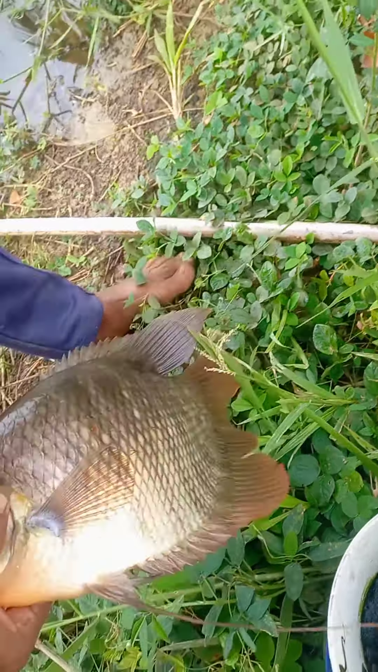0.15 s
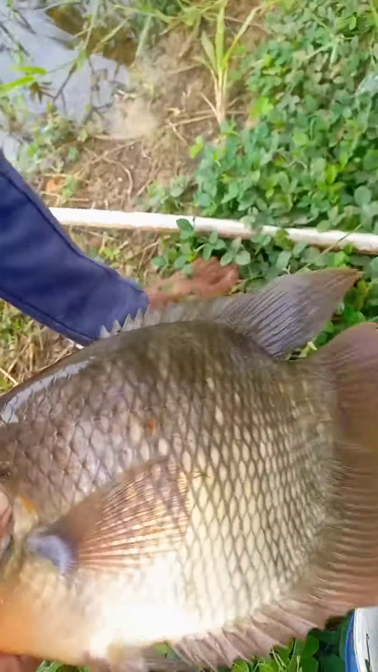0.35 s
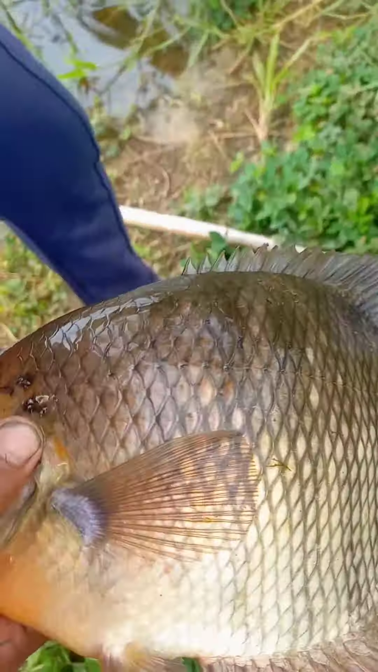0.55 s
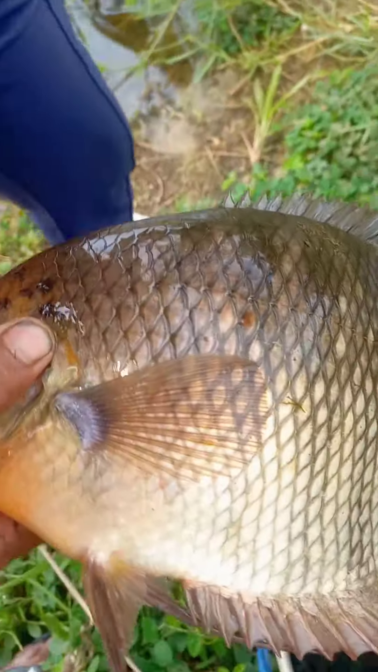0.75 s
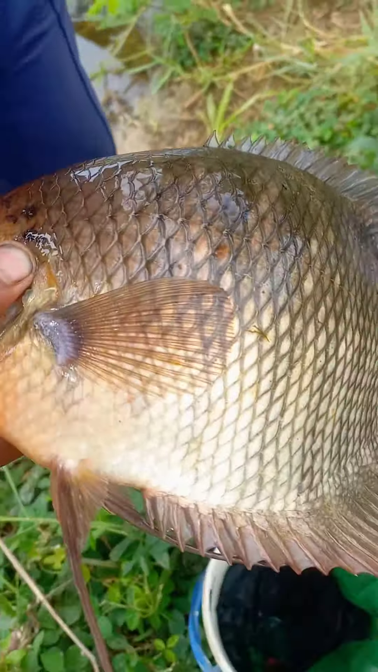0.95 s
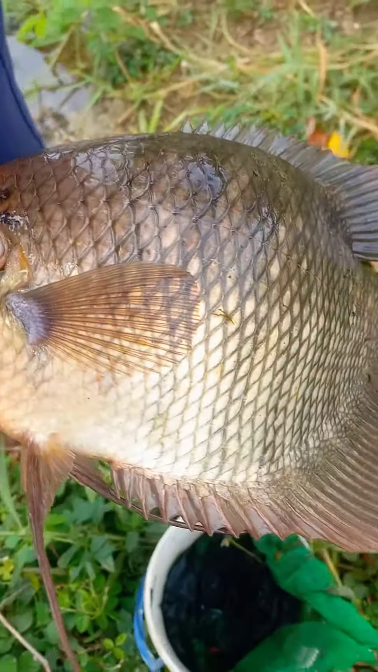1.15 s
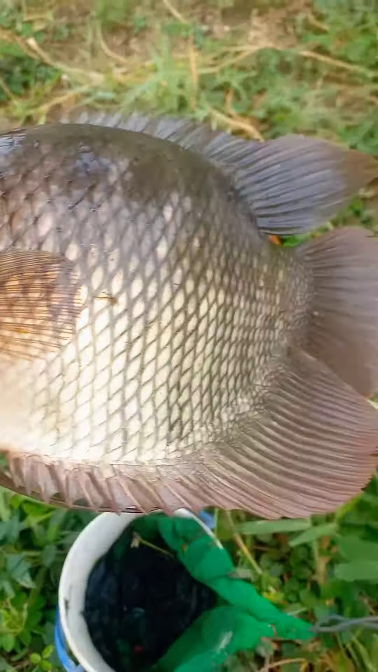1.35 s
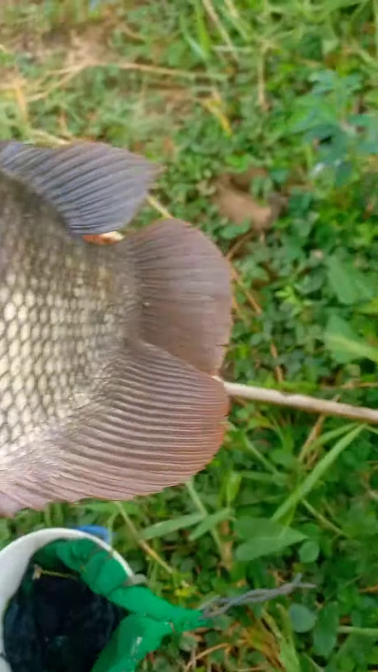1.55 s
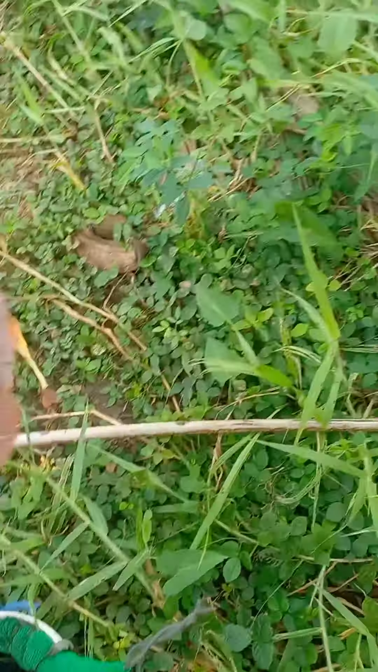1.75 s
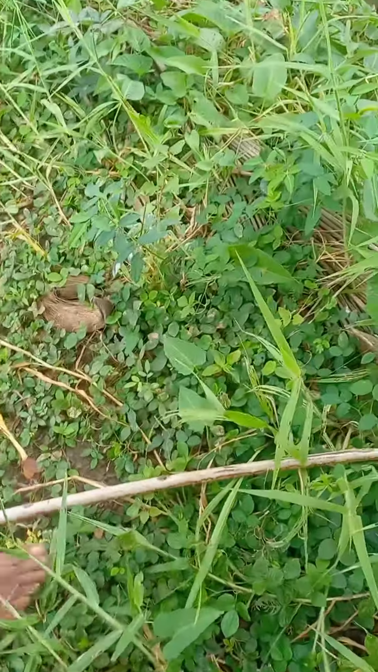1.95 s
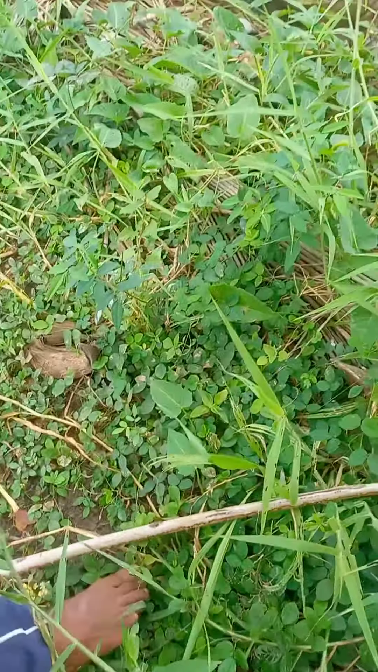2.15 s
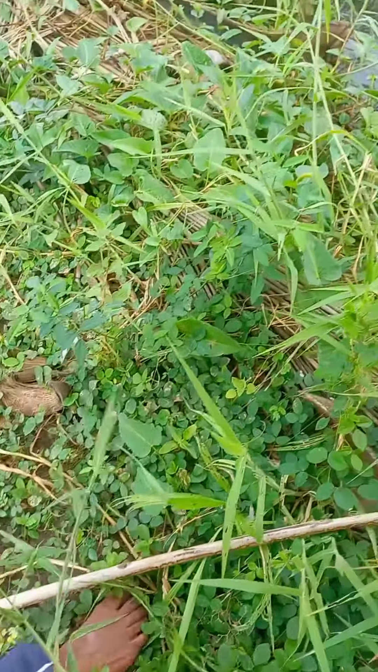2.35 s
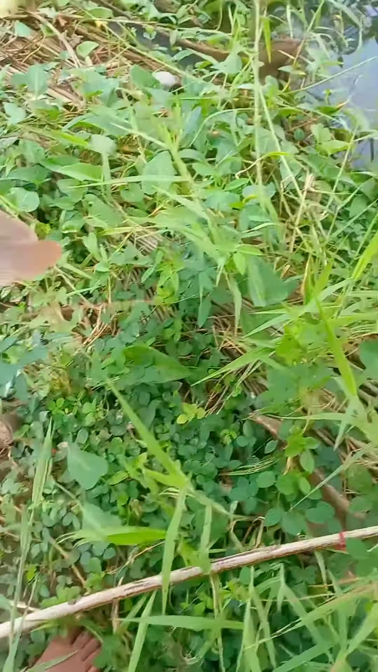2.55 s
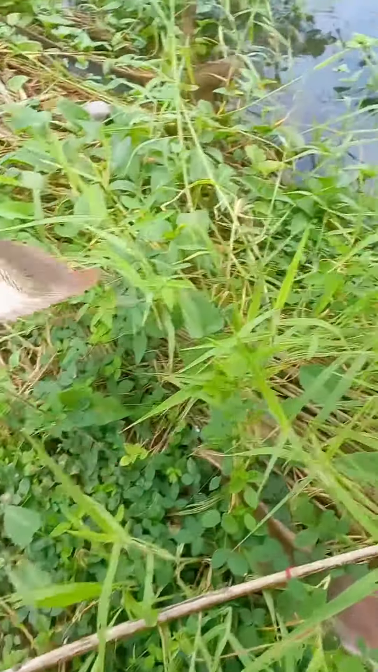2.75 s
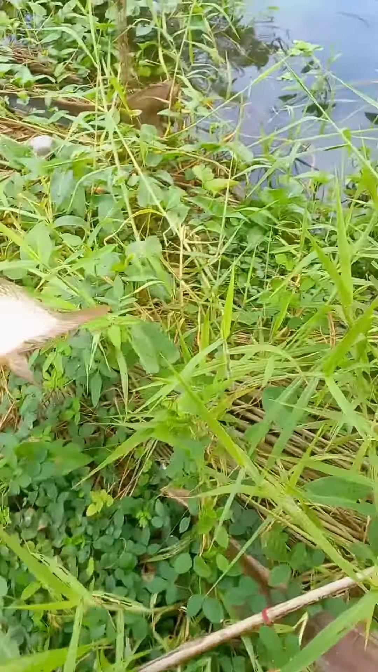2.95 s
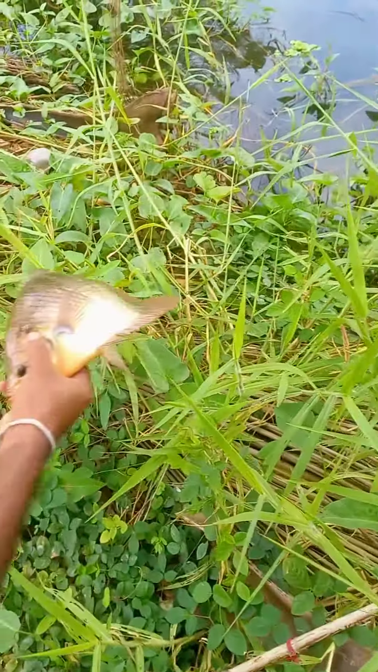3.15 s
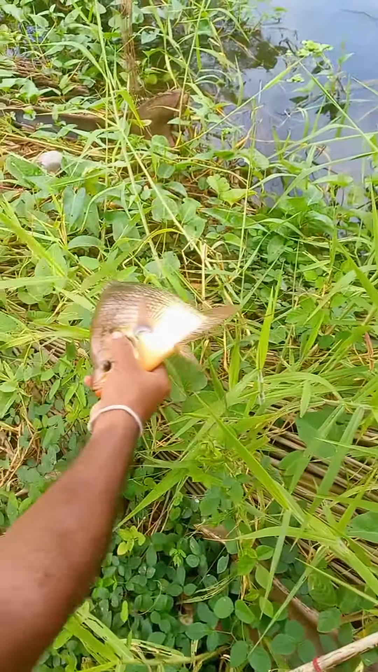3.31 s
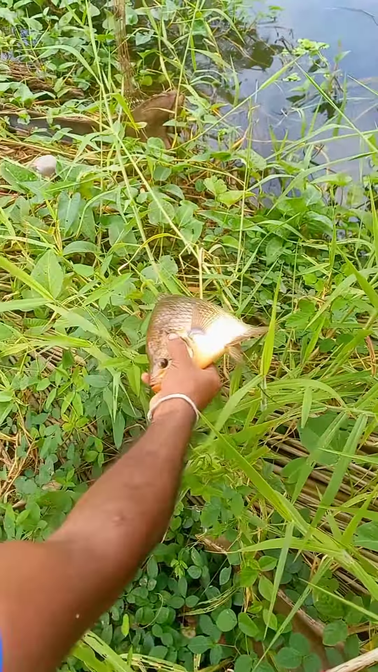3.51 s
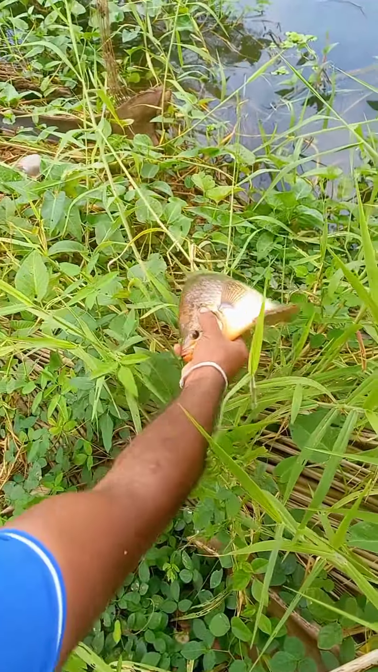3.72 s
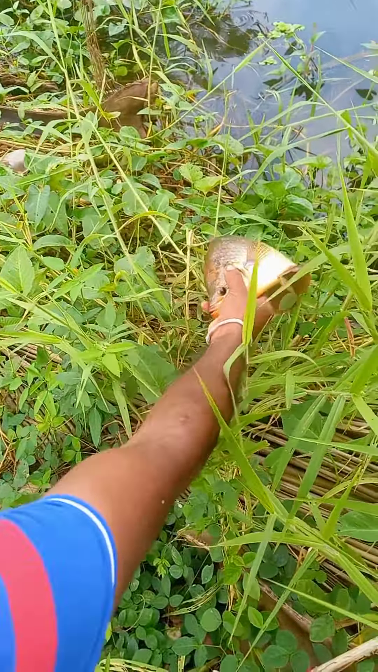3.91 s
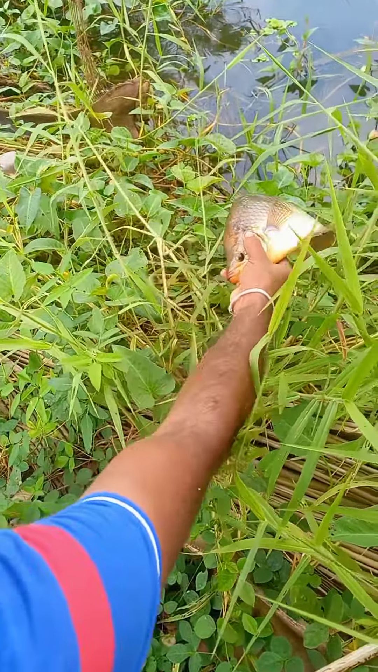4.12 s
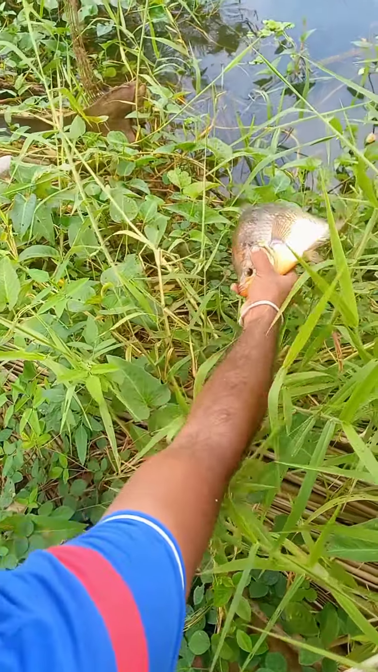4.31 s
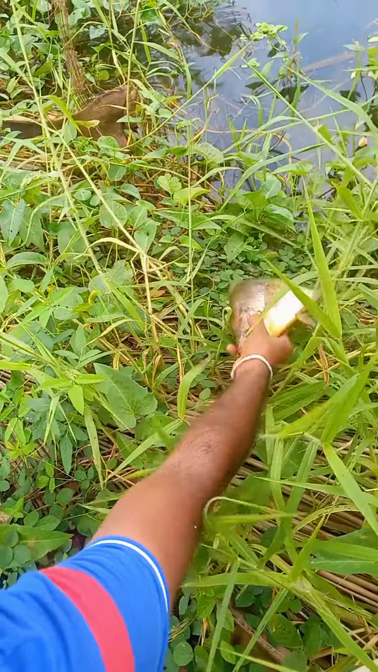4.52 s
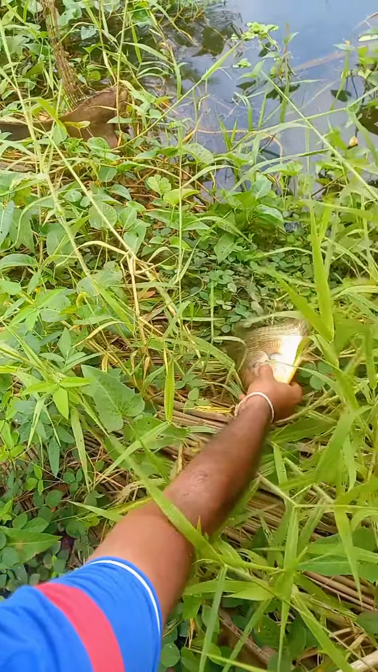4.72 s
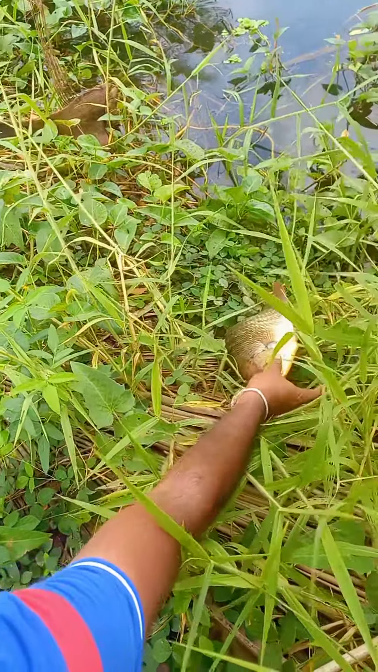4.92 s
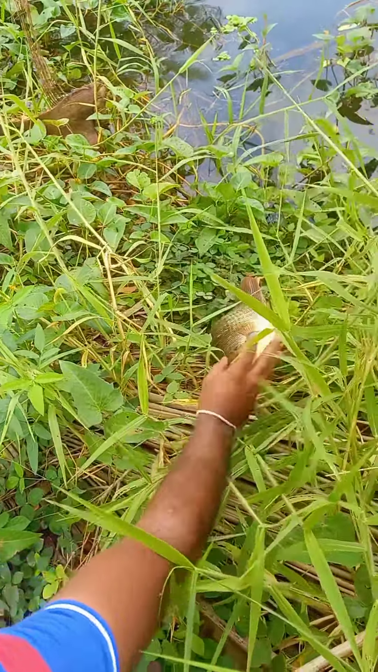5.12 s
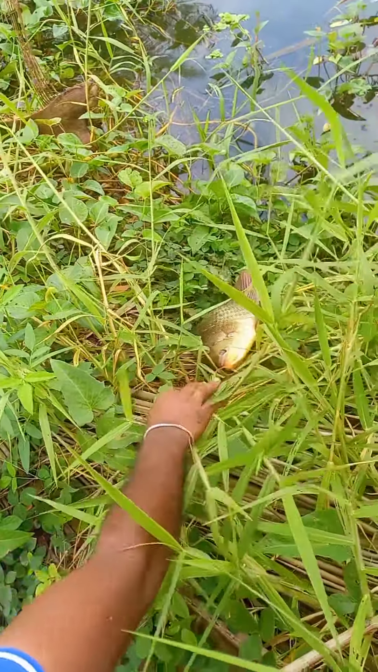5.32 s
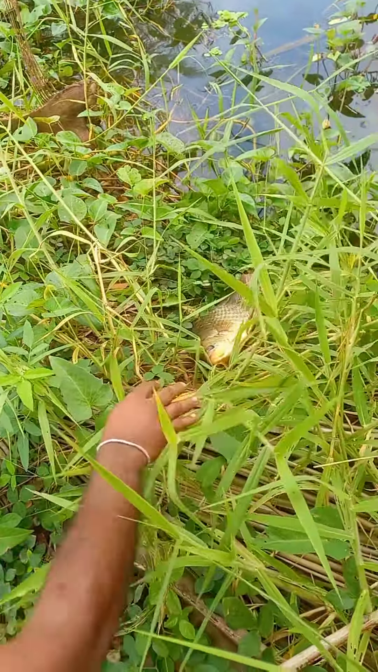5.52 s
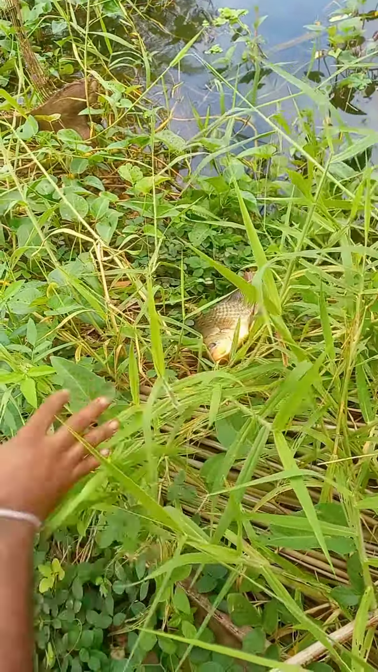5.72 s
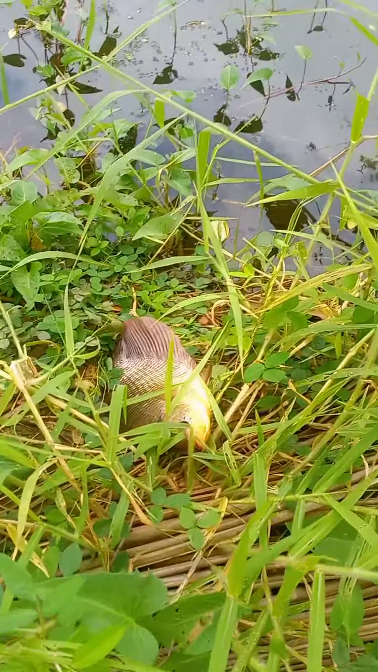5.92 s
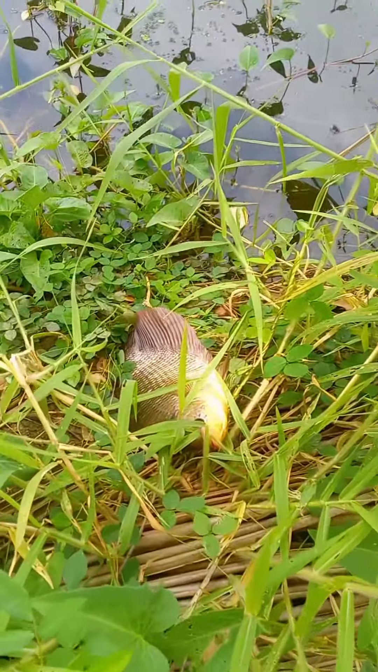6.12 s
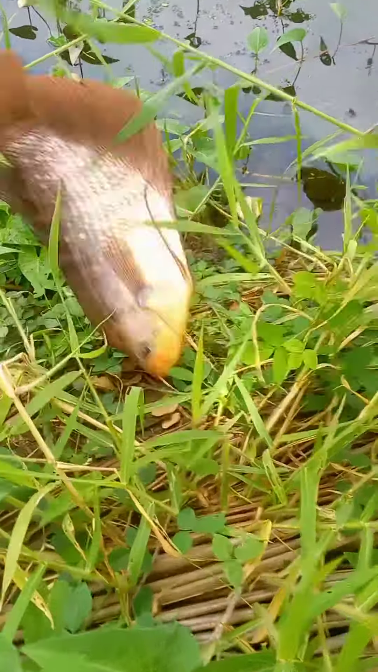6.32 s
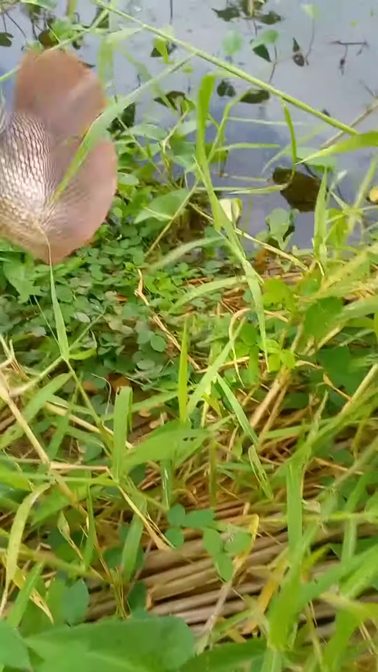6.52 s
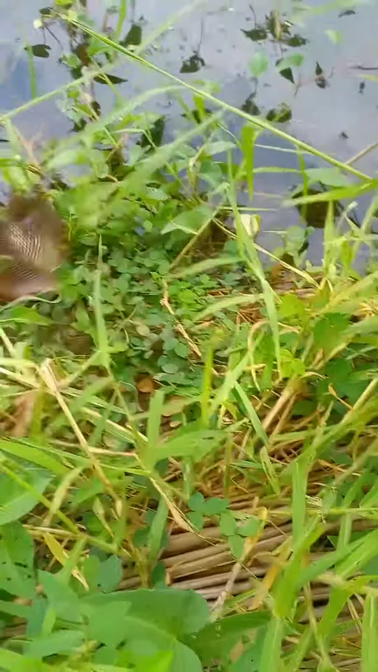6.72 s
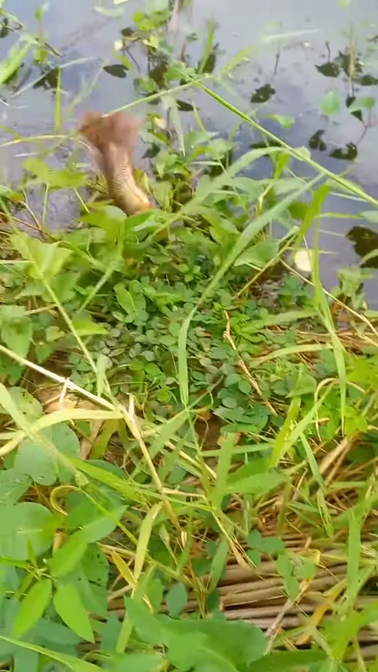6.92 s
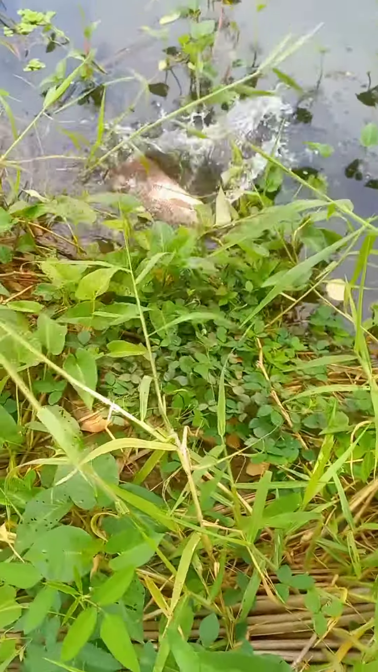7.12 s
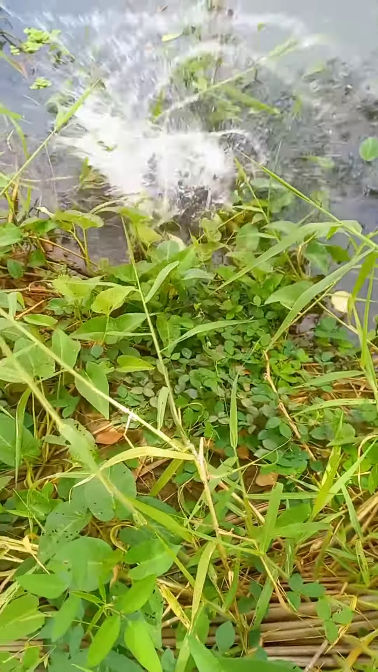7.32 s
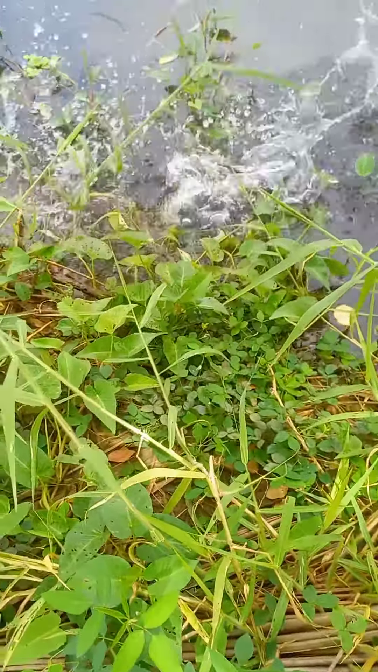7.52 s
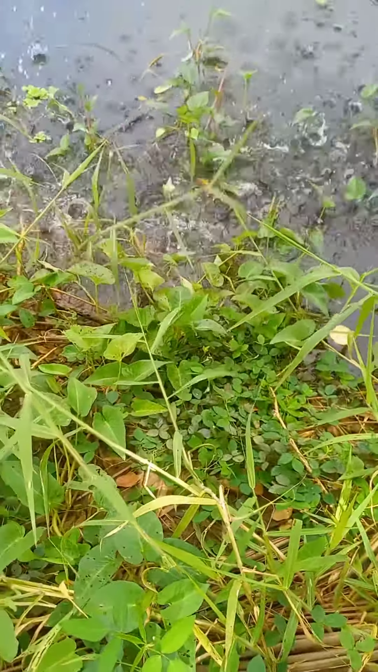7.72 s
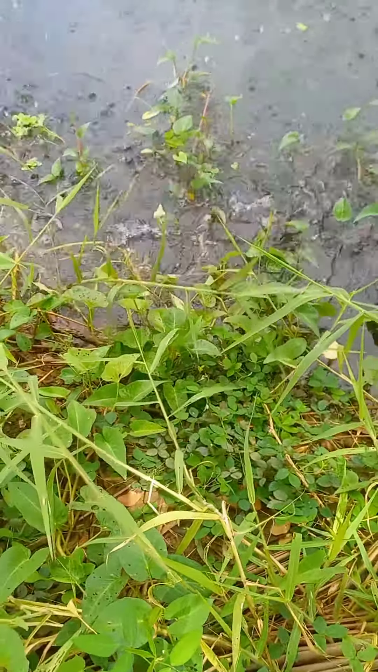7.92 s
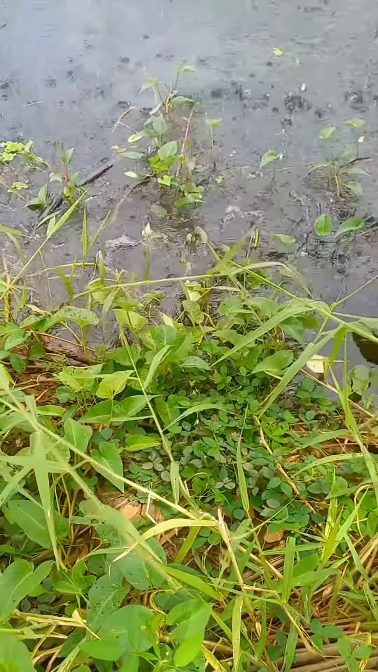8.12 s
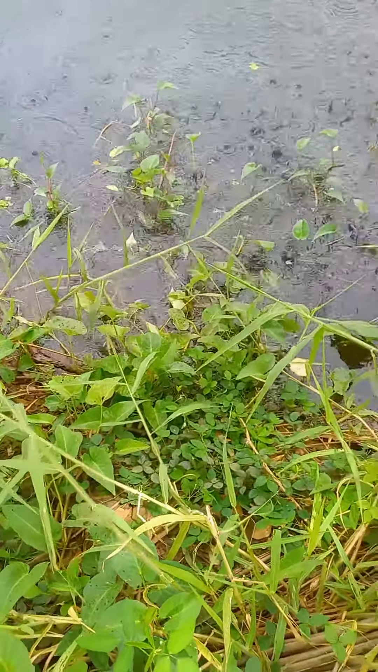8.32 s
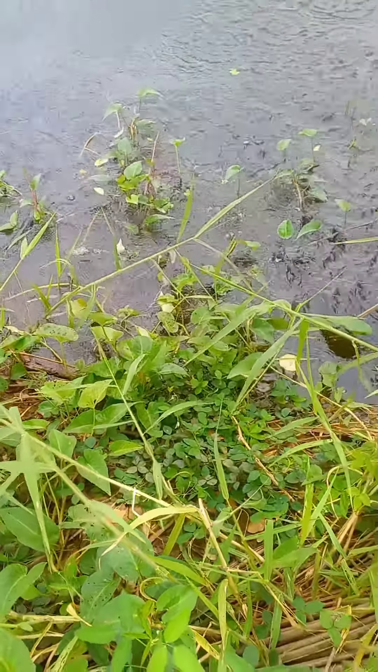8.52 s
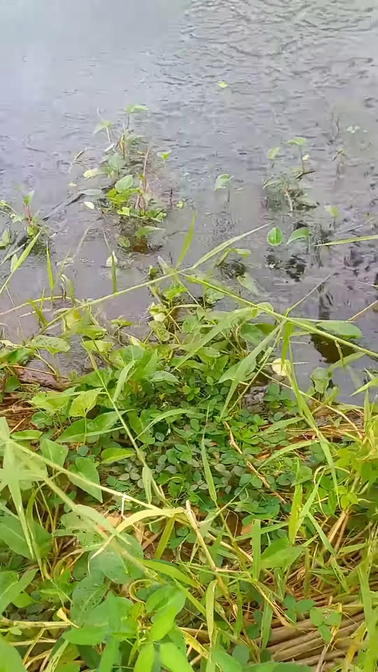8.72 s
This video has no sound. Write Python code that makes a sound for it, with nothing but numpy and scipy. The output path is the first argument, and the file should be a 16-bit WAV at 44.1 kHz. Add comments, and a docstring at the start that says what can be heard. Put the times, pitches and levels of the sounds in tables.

```python
"""Fish escaping down a pond bank

A fish lies on the grassy bank close to the microphones: noise clicks rustle as leaves, short bursts snap.
A thin squeak slides from a pip into rasp. Bursts of crackle slap and low sine rings thump down the bank.
In the shallows, rings of rising pitch gulp as bubbles, and sparse impulses make spray and falling drops.
Shrill bands of noise are insects in the weeds, over a far rumble, open air and a faint distant swell."""
import sys
import numpy as np
from scipy import signal
from scipy.fft import rfft, irfft, next_fast_len
from scipy.io import wavfile
from scipy.ndimage import map_coordinates

SR = 44100
rng = np.random.default_rng(int(sys.argv[2]) if len(sys.argv) > 2 else 0)


def log_audio(samples):
    """Write samples as a 16-bit WAV file to the path given in sys.argv[1]."""
    # one column per channel
    frames = np.atleast_2d(samples).T
    # limit to full scale, then quantise
    limited = np.clip(frames, -1, 1)
    pcm = np.round(limited * 32767).astype(np.int16)
    wavfile.write(sys.argv[1], SR, pcm)


N = 385875


def amp(db):
    """Decibels to gain."""
    return 10 ** (np.asarray(db) / 20)


def unit(x):
    """Scale to rms 1."""
    return x / np.sqrt(np.mean(x ** 2) + 1e-20)


def along(points, hz):
    """(Hz, value) points read on a log axis."""
    f, v = np.transpose(points)
    return np.interp(np.log(hz + 1), np.log(f + 1), v)


def curves(rows):
    """One value per sample for each column after the time."""
    s, *cols = np.transpose(rows)
    return [np.interp(np.arange(N) / SR, s, c) for c in cols]


def wobble(rate):
    """A smooth random curve, rate knots a second."""
    knots = rng.standard_normal(int(N * rate / SR) + 4)
    return map_coordinates(knots, [np.arange(N) * rate / SR])


def filtered(x, response):
    """x times a response of frequency."""
    n = x.shape[-1]
    m = next_fast_len(n + SR // 10)
    return irfft(rfft(x, m) * response(np.fft.rfftfreq(m, 1 / SR)), m)[..., :n]


def add(track, s, sound):
    """Mix a sound in at time s."""
    start = int(s * SR)
    track[start:start + len(sound)] += sound[:max(N - start, 0)]


def envelope(s, attack, hold, t60):
    """A gain that rises from time s, holds and dies away (all in seconds)."""
    t = np.maximum(np.arange(N) / SR - s, 0)
    return (1 - np.exp(-(t / attack) ** 2)) * amp(-60 * np.maximum(t - attack - hold, 0) / t60)


def together(gains):
    """Unrelated sounds add in power."""
    return np.sqrt(sum(gain ** 2 for gain in gains))


def spread(pair):
    """Two unrelated signals become one sound that reaches the microphones from all around."""
    # left-right likeness of sound from all around: pitch_hz, correlation (-1 to 1)
    likeness = [(60, 0.96), (150, 0.98), (300, 0.82), (600, 0.37), (1300, -0.3), (2500, 0.11),
                (16000, 0.037)]
    turn = lambda hz: np.arccos(np.clip(along(likeness, hz), -1, 1)) / 2
    mid, side = filtered(pair, lambda hz: np.array([np.cos(turn(hz)), np.sin(turn(hz))]))
    return np.array([mid + side, mid - side])


def rush(spectrum):
    """Diffuse stereo noise of rms 1."""
    noise = rng.standard_normal((2, N))
    return unit(spread(filtered(noise, lambda hz: amp(along(spectrum, hz)))))


def narrow(centre_hz, width_hz):
    """A fuzzy band of noise that follows a moving centre, rms 1."""
    carrier = np.exp(2j * np.pi * np.cumsum(centre_hz) / SR)
    return unit((carrier * (wobble(width_hz) + 1j * wobble(width_hz))).real)


def crackle(rate, scatter_db, size):
    """Tiny impulses of uneven strength, rate a second, rms 1."""
    strength = amp(scatter_db * np.clip(rng.standard_normal(size), -2, 2))
    return unit((rng.random(size) < rate / SR) * strength * rng.choice([-1, 1], size))


def from_ahead(x, lag_ms, scatter_db, t60):
    """A near sound reaches the left microphone first; water and plants scatter a short, ever-changing tail."""
    # balance of near sound: pitch_hz, left_minus_right_db
    balance = [(60, -14), (300, 2.5), (1000, 0.5), (3000, 2), (6500, 4), (14000, 6)]
    lag_s = lag_ms / 1000
    direct = filtered(x, lambda hz: np.exp(1j * np.pi * hz * lag_s * np.array([[1], [-1]])))
    t = np.arange(SR // 8) / SR
    tails = unit(rng.standard_normal((2, 2, len(t))) * amp(-60 * t / t60)) / np.sqrt(len(t))
    # the sound passes back and forth between two tails, two turns a second
    turn = 2 * np.pi * 2 * np.arange(N) / SR
    shares = [np.cos(turn), np.sin(turn)]
    echo = sum(signal.oaconvolve((x * share)[None], spread(tail), axes=1)[:, :N]
               for share, tail in zip(shares, tails))
    sides = np.array([[.5], [-.5]])
    return filtered(direct + amp(scatter_db) * echo, lambda hz: amp(along(balance, hz) * sides))


def outdoors():
    """Far rumble, the soft wash of open air and a faint hollow swell that sinks in pitch."""
    # slow drift of the background: time_s, rumble_level_db
    drift = [(0, -47), (.7, -48), (1.5, -45), (4, -46), (7.7, -44), (8.75, -47.5)]
    # colour of the far rumble: pitch_hz, density_db (per Hz)
    rumble_colour = [(22, -52), (36, -16), (52, -23), (68, -3.5), (88, 2.5), (125, -2), (168, -7.5),
                     (280, -11.5), (400, -28), (600, -39)]
    # colour of the open air: pitch_hz, density_db (per Hz)
    air_colour = [(200, -8), (300, 0.5), (550, -1.5), (900, -6.5), (1400, -8.5), (1950, -6), (2400, -14.5),
                  (4000, -13.5), (9000, -19.5), (13000, -22), (16000, -20.5)]
    level_db, = curves(drift)
    rumble = amp(level_db + 0.93 * wobble(7.6)) * rush(rumble_colour)
    # the air follows the drift of the rumble
    air_db = -51.5 + level_db - level_db.mean()
    air = amp(air_db + 1.48 * wobble(6.4)) * rush(air_colour)
    swell_s = 0.46
    swell_hz = 777 - 140 * (np.arange(N) / SR - swell_s)  # sinks 140 Hz a second
    swell = amp(-63) * envelope(swell_s, attack=0.23, hold=1.7, t60=1.3)
    return rumble + air + swell * narrow(swell_hz, width_hz=240)


def insects():
    """Many fast wing strokes blur into shrill bands; one nearer singer swells and fades in a long phrase."""
    # level of the chorus: time_s, level_db
    chorus_level = [(0, -58.5), (1.5, -54), (5.55, -50.5), (5.755, -55.5), (5.772, -46.5), (6.1, -49),
                    (8, -48), (8.75, -51.5)]
    # wing resonances of the chorus: centre_hz, width_hz, level_db
    wing_modes = [(5666, 107, -7), (5867, 8.1, 7), (6080, 12, 3.5), (6250, 94, -7.5), (6990, 400, -8),
                  (5960, 700, -8.5)]
    # colour of the nearer singer: pitch_hz, density_db (per Hz)
    solo_colour = [(4700, -70), (5150, -8), (5600, -7.5), (6300, -9), (6800, -15.5), (7400, -30)]
    wings = lambda hz: sum(amp(db) * np.exp(-.5 * ((hz - centre) / width) ** 2)
                           for centre, width, db in wing_modes)
    shrill = unit(filtered(rng.standard_normal((2, N)), wings))
    chorus = amp(curves(chorus_level)[0] + 1.15 * wobble(40)) * shrill
    phrase = envelope(2.44, attack=0.48, hold=1.35, t60=2.9)
    return chorus + phrase * amp(-48.5 + 0.31 * wobble(70)) * rush(solo_colour)


def leaves():
    """Blades of grass slide and catch in clumps of tiny clicks."""
    # colour of the rustle: pitch_hz, density_db (per Hz)
    leaf_colour = [(400, -56), (1200, -2), (2000, 2), (3000, -3.5), (5000, 1.5), (9000, -1.5), (14000, 3.5),
                   (16000, -4.5)]
    # strokes through the leaves: start_s, hold_s, level_db
    strokes = [(1.06, 0.18, -56.5), (1.592, 0.65, -51.5), (2.395, 3.1, -62.5), (3.13, 0.24, -48),
               (3.985, .04, -49), (4.433, 0.26, -49.5), (4.78, 0.7, -56), (6.004, 0.36, -55.5),
               (6.625, 0.096, -40), (6.83, 1.42, -51)]
    clicks = np.array([crackle(rate=2200, scatter_db=1.5, size=N) for _ in range(2)])
    rustle = unit(spread(filtered(clicks, lambda hz: amp(along(leaf_colour, hz)))))
    brushing = together(amp(db) * envelope(s, attack=0.046, hold=hold, t60=0.35)
                        for s, hold, db in strokes)
    lean_db = np.array([[1.2], [-1.2]])  # towards the left
    return rustle * brushing * amp(2.6 * wobble(45) + lean_db)


def ticks():
    """Each snapping stem or ticking drop is a short, dry burst in its own band."""
    # snaps and drops: start_s, peak_db (before scattering), centre_hz, width_octaves, t60_s
    snaps = [(3.048, -36, 2340, 0.19, 0.014), (3.0487, -30.5, 7000, 1.2, 0.0088),
             (3.302, -23.5, 9050, 2.6, 0.0055), (3.748, -19.5, 12800, 0.36, 0.0039),
             (4.021, -32, 1500, 0.29, 0.014), (4.561, -28, 6500, 0.47, 0.011),
             (4.854, -42, 990, 0.65, 0.019), (6.282, -30, 3100, 0.15, 0.0077),
             (6.536, -37.5, 3500, 1.9, 0.046), (6.953, -24.5, 14000, 0.97, 0.04),
             (7.82, -28.5, 9000, 1.8, 0.016), (7.932, -33, 5130, 0.29, .04),
             (8.163, -32, 9900, 0.86, 0.032), (8.433, -42, 2260, 0.38, .2)]
    out, t = np.zeros(N), np.arange(SR // 8) / SR
    for s, db, centre_hz, octaves, t60 in snaps:
        band = lambda hz: np.exp(-.5 * (np.log2((hz + 1) / centre_hz) / octaves) ** 2)
        burst = amp(-60 * t / t60) * filtered(rng.standard_normal(len(t)), band)
        add(out, s, amp(db) * burst / np.abs(burst).max())
    return from_ahead(out, lag_ms=.02, scatter_db=-7, t60=.02)


def squeak():
    """A soft lead-in, a clean pip, then a rising note that breaks into rasp: a sine gives way to noise."""
    # path of the squeak: time_s, pitch_hz, level_db, roughness (0 to 1)
    path = [(.99, 4050, -67, .9), (1.06, 4400, -54, .65), (1.082, 4400, -66, .9), (1.116, 4100, -53, .5),
            (1.123, 4190, -39, .1), (1.136, 4260, -46.5, .55), (1.172, 4680, -42, .55),
            (1.187, 4400, -44.5, .9), (1.225, 4600, -53, .9), (1.3, 4700, -63, .85)]
    pitch_hz, db, rough = curves(path)
    t = np.arange(N) / SR
    tone = unit(np.sin(2 * np.pi * np.cumsum(pitch_hz) / SR))
    close = narrow(pitch_hz, width_hz=720)
    lower = amp(1) * narrow(pitch_hz - 200, width_hz=1600)
    broad = amp(-6.5) * narrow(pitch_hz, width_hz=12000)
    rasp = unit(close + lower + broad)
    sounding = (t > path[0][0]) * (t < path[-1][0])
    voice = amp(db) * sounding * (np.sqrt(1 - rough) * tone + np.sqrt(rough) * rasp)
    heard = from_ahead(voice * amp(1.5 * wobble(400)), lag_ms=.05, scatter_db=-8, t60=.06)
    return amp(np.array([[2], [-2]])) * heard


def smack(db, rise, t60, tilt):
    """Wet skin hits leaves: a crack, a burst of crackle and a faint tail as wet leaves spring back."""
    # colour of wet skin: pitch_hz, density_db (per Hz)
    skin_colour = [(35, -32), (170, 5), (450, 4), (1200, 4.5), (1600, 0), (2200, 6), (5000, 6),
                   (7500, -6.5), (10000, -6), (15000, -1)]
    t = np.arange(SR // 4) / SR
    colour = lambda hz: amp(along(skin_colour, hz) + tilt * np.log2(1 + hz / 400))
    crack = amp(14) * (np.arange(len(t)) == SR // 1000)  # one impulse, 1 ms in
    grains = crackle(rate=3200, scatter_db=3.5, size=len(t))
    burst = unit(filtered(crack + grains, colour))
    settling = amp(-25 - 60 * t / .2)
    swell = (1 - np.exp(-t / rise)) * (amp(-60 * t / t60) + settling)
    return amp(db - 8.5) * burst * swell / swell.max()  # 8.5 dB of room for the peaks of the burst


def flops():
    """Wet skin smacks the leaves; the body knocks on the bank and thumps the soil, working its way left."""
    # slaps of tail and flank: start_s, nominal_peak_db, rise_s, t60_s, tilt_db_per_octave
    slaps = [(6.181, -16, 0.015, 0.087, -0.2), (6.2123, -10.5, 0.00051, 0.094, -0.3),
             (6.24, -30, 0.0013, 0.47, -2), (6.3723, -21.5, 0.00029, 0.074, -4.5),
             (6.675, -30, 0.035, 0.25, -5), (6.693, -16.5, 0.003, 0.068, 8),
             (6.692, -30, 0.0022, 0.082, -7), (6.716, -25.5, .006, 0.16, -7),
             (6.734, -21.5, 0.00081, 0.035, -7), (6.7421, -10, 0.00028, 0.031, -0.5),
             (6.7498, -10.5, 0.00054, 0.03, 4), (6.752, -22.5, 0.0016, 0.16, -6)]
    # soft blows on the soil, from feet and fish: start_s, nominal_peak_db, pitch_hz, t60_s
    thuds = [(2.325, -25, 107, 0.12), (5.321, -31.5, 86, 0.15), (6.38, -13, 111, 0.042),
             (6.7531, -12, 133, 0.047)]
    # knocks of the body on the matted bank: start_s, level_db
    knocks = [(6.213, -41), (6.3726, -34), (6.735, -36), (6.7408, -22), (6.7484, -22.5)]
    # dull modes of the bank: pitch_hz, relative_level_db
    bank_modes = [(295, 2.5), (425, 3), (540, -0.5), (800, -4.5), (1000, -2), (1220, 0)]
    # where the fish lies: time_s, left_minus_right_db
    fish_side = [(6.2, -0.5), (6.75, 3.5)]
    skin, body, t = np.zeros(N), np.zeros(N), np.arange(SR // 4) / SR

    def ring(db, hz, t60):
        """A damped sine with a soft start."""
        return amp(db - 60 * t / t60) * (1 - np.exp(-2 * t * hz)) * np.sin(2 * np.pi * hz * t)

    for s, db, rise, t60, tilt in slaps:
        add(skin, s, smack(db, rise, t60, tilt))
    for s, db, hz, t60 in thuds:
        add(body, s, ring(db, hz, t60))
    for s, db in knocks:
        # every knock strikes the modes a little differently
        add(body, s, sum(ring(db + mode_db + rng.normal(0, 2), hz * rng.normal(1, 0.025), t60=0.04)
                         for hz, mode_db in bank_modes))
    heard_skin = from_ahead(skin, lag_ms=.11, scatter_db=-5, t60=.016)
    heard_body = from_ahead(body, lag_ms=.2, scatter_db=-12, t60=.03)
    return (heard_skin + heard_body) * amp(curves(fish_side)[0] * np.array([[.5], [-.5]]))


def bubble(hz, cycles, glide):
    """A trapped air pocket swells, rings for some cycles and rises in pitch as it nears the surface."""
    life_s = cycles / hz
    u = np.arange(int(SR * life_s)) / (SR * life_s)  # 0 to 1 over its life
    ring = amp(-60 * u) * (1 - np.exp(-(u / 0.058) ** 2))
    return ring / ring.max() * np.sin(2 * np.pi * cycles * (u + glide * u * u / 2))


def gulps():
    """A large air pocket rings unsteadily and tears into a spatter of smaller, higher bubbles."""
    # air pockets closing behind the tail: time_s, nominal_peak_db, pitch_hz
    pockets = [(6.997, -31, 480), (7.007, -34, 2280), (7.047, -39, 500), (7.05, -25.5, 990),
               (7.079, -34, 1100), (7.222, -30, 735), (7.26, -32.5, 430), (7.2625, -24, 2280),
               (7.275, -31, 462), (7.278, -32, 790), (7.286, -37, 2150), (7.289, -29.5, 476),
               (7.292, -21, 1050), (7.309, -30, 770), (7.347, -35, 367), (7.351, -19.5, 784),
               (7.362, -28, 736), (7.37, -28.5, 452), (7.394, -27, 740), (7.423, -28.5, 732),
               (7.426, -35, 397), (7.454, -31, 490), (7.537, -33.5, 502), (7.542, -32.5, 696),
               (7.543, -26, 1220), (7.590, -31, 468), (7.601, -33, 970), (7.611, -37, 475),
               (7.730, -43, 425)]
    out = np.zeros(N)
    for s, db, hz in pockets:
        add(out, s - .002, amp(db) * bubble(hz, cycles=24.6, glide=0.07))  # begins 2 ms ahead
        for delay, split, strength in rng.random((6, 3)):
            small = bubble(hz * 2 ** (0.18 + 1.8 * split), cycles=9, glide=.2)
            add(out, s + .028 * delay, amp(db - 8 - 13 * strength) * small)
    return out * amp(2.4 * wobble(330))


def splats():
    """A sheet of water slaps shut on water: a sudden clump of tiny bursts around one pitch."""
    # slaps of water: start_s, level_db, centre_hz, t60_s
    sheets = [(6.982, -30, 2010, 0.066), (7.047, -30.5, 2000, 0.056), (7.2225, -23, 1900, 0.022),
              (7.2618, -22.5, 2810, 0.024), (7.2917, -37, 1500, 0.049), (7.355, -27.5, 1600, 0.056),
              (7.516, -40, 2000, 0.034), (7.531, -33, 1700, 0.065), (7.794, -33, 2020, 0.037)]
    out, t = np.zeros(N), np.arange(SR // 8) / SR
    for s, db, centre_hz, t60 in sheets:
        band = lambda hz: 1 / (1 + (np.log2((hz + 1) / centre_hz) / 0.76) ** 2) ** 2.1  # 0.76 octaves
        clump = unit(filtered(crackle(rate=2300, scatter_db=6, size=len(t)), band))
        add(out, s, amp(db - 60 * t / t60) * (1 - np.exp(-t / .0005)) * clump)
    return out


def froth(count):
    """Many small bubbles ring briefly during the main thrashing, rms 1 there; large ones are rarer."""
    out, start_s, end_s = np.zeros(N), 6.95, 8.0
    for when, size, strength in rng.random((count, 3)):
        ring = bubble(2800 * 2 ** (-2.5 * size ** 1.4), cycles=21, glide=0.2)
        add(out, start_s + when * (end_s - start_s), amp(-20 * strength) * ring)
    return out / out[int(start_s * SR):int(end_s * SR)].std()


def thrown(s):
    """Gain of the water that one tail beat throws up, and that rains back after its flight."""
    attack_s, flight_s = 0.0083, 0.234
    fall = amp(-9.5) * envelope(s + flight_s, attack_s, hold=0.13, t60=0.9)
    return envelope(s, attack_s, hold=0.012, t60=0.52) + fall


def splash():
    """Tail beats churn up drops, froth and mist; a last soft swirl has drops only."""
    # tail beats in the shallows: start_s, churn_db, mist_db
    tail_beats = [(6.951, -39.5, -40), (7.045, -42, -62), (7.205, -39, -48), (7.265, -34.5, -36.5),
                  (7.35, -41, -62), (8.391, -46.5, -78)]
    # colour of the drops: pitch_hz, density_db (per Hz)
    water_colour = [(200, -13), (500, -5), (1600, 1), (2300, 3), (3100, 3.5), (7000, -3.5), (10300, -12.5),
                    (15500, -35)]
    # colour of the finest spray: pitch_hz, density_db (per Hz)
    mist_colour = [(2500, -11), (4500, 2), (12000, -1.5), (16000, 3)]
    # tone balance of the splash: pitch_hz, gain_db
    tone_balance = [(510, 1), (620, -8), (740, -2), (1400, -3), (1600, -4), (2450, 5.5), (2950, -6),
                    (3400, 0.5)]
    beats = [(thrown(s), churn_db, mist_db) for s, churn_db, mist_db in tail_beats]
    churning = together(gain * amp(db) for gain, db, _ in beats)
    misting = together(gain * amp(db) for gain, _, db in beats)

    def drops(spectrum, rate):
        """Falling drops: coloured crackle, rms 1."""
        grains = crackle(rate, scatter_db=2.5, size=N)
        return unit(filtered(grains, lambda hz: amp(along(spectrum, hz))))

    def churn():
        """One fresh draw of unsteady drops, froth and mist."""
        surge = churning * amp(2.6 * wobble(90))
        body = amp(-8) * drops(water_colour, rate=520) + amp(-4) * froth(count=640)
        return surge * body + amp(-2.5) * misting * drops(mist_colour, rate=2000)

    pockets = from_ahead(gulps() + splats(), lag_ms=.19, scatter_db=-8, t60=.07)
    spray = from_ahead(churn(), lag_ms=0.19, scatter_db=0.0, t60=0.082)
    # a second, unrelated layer of spray thickens the splash
    spray = spray + from_ahead(churn(), lag_ms=0.092, scatter_db=-1.5, t60=.06)
    return filtered(pockets + spray, lambda hz: amp(along(tone_balance, hz)))


def scene():
    """Everything on the bank and in the pond."""
    return outdoors() + insects() + leaves() + ticks() + squeak() + flops() + splash()


def record(dry):
    """The recorder thins the deepest bass, below about 42 Hz, and keeps nothing above its band limit."""
    top_hz = 15950
    return filtered(dry, lambda hz: (hz < top_hz) * (1 - 1 / (1 + (hz / 42) ** 6)))


dry = scene()
out = record(dry)
log_audio(out)
```